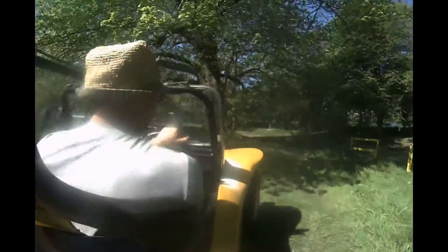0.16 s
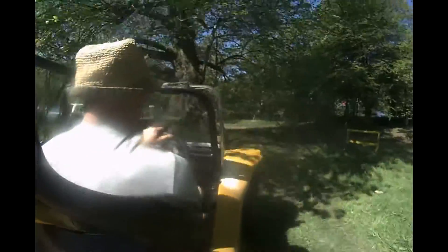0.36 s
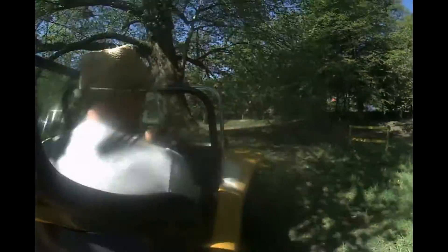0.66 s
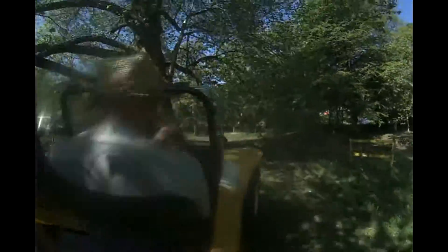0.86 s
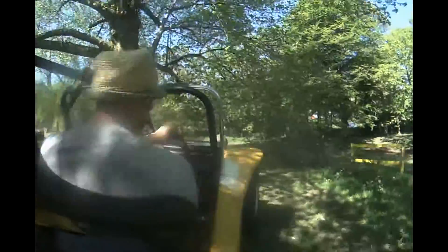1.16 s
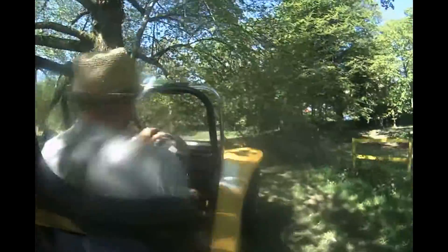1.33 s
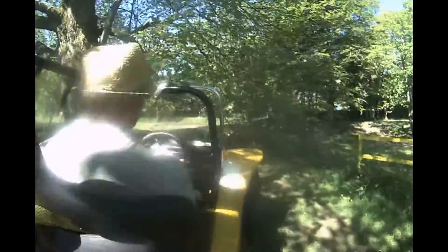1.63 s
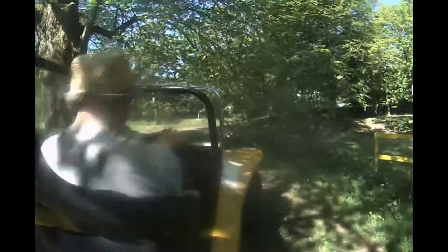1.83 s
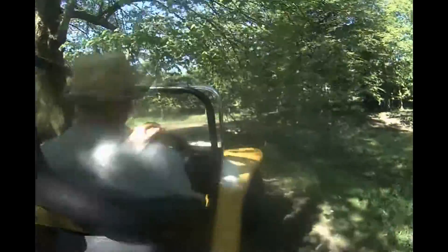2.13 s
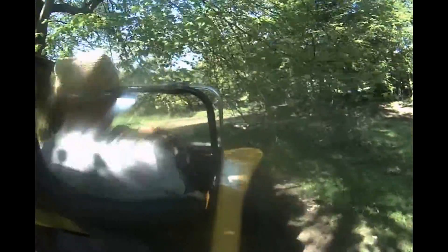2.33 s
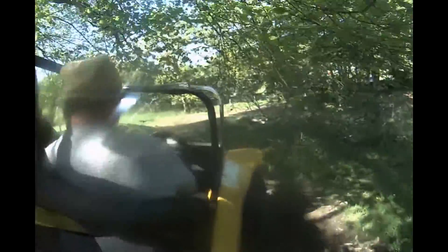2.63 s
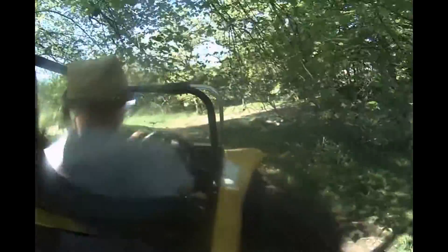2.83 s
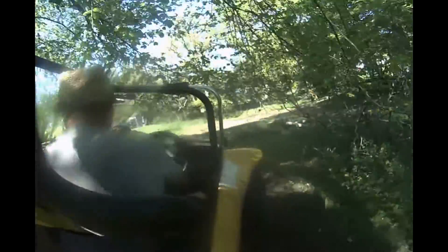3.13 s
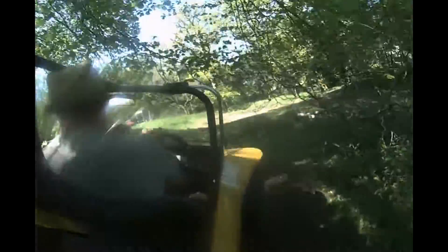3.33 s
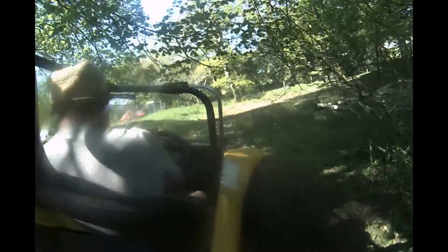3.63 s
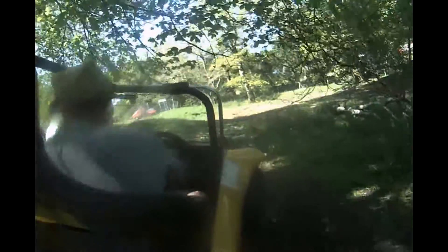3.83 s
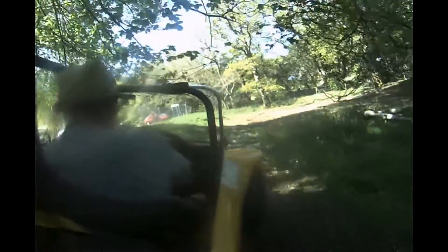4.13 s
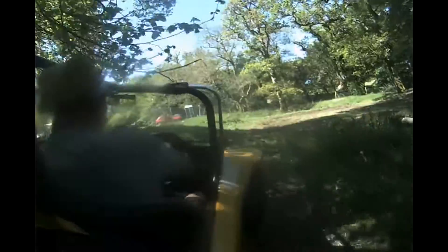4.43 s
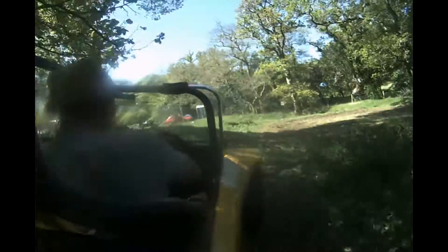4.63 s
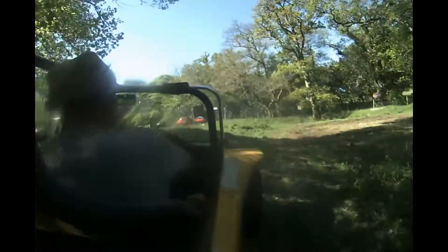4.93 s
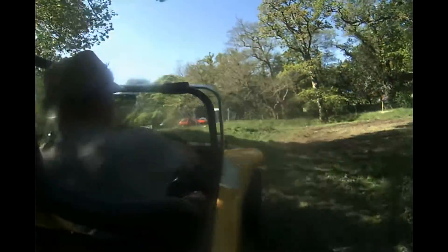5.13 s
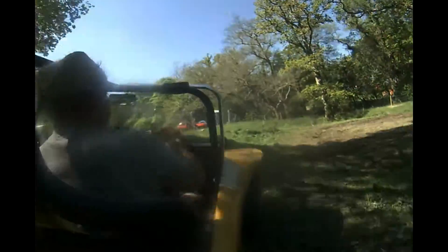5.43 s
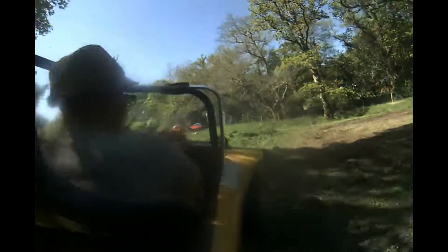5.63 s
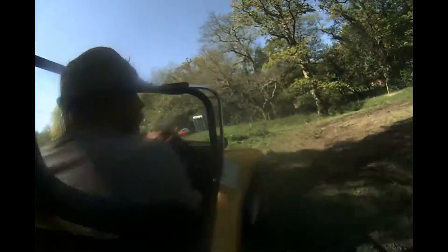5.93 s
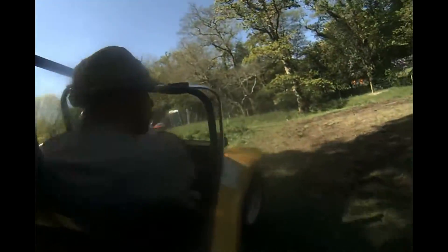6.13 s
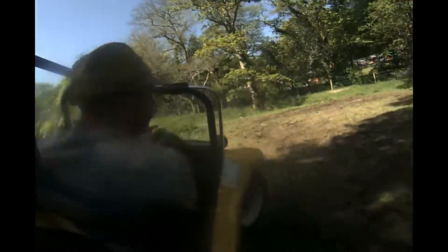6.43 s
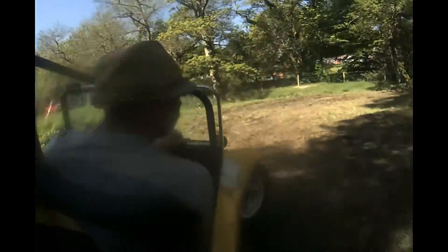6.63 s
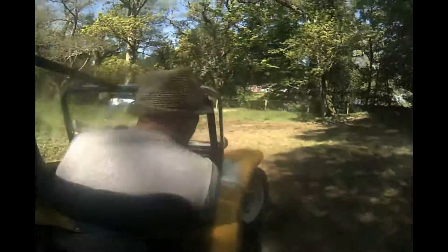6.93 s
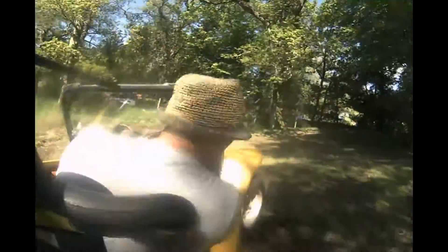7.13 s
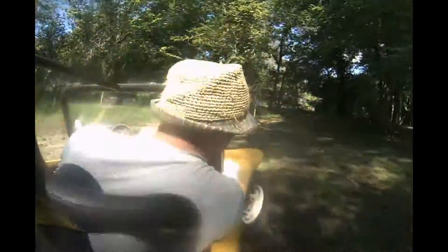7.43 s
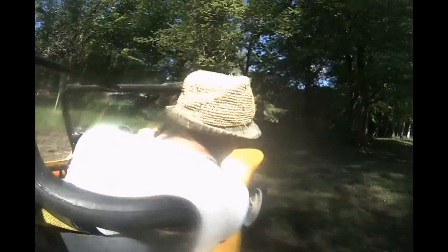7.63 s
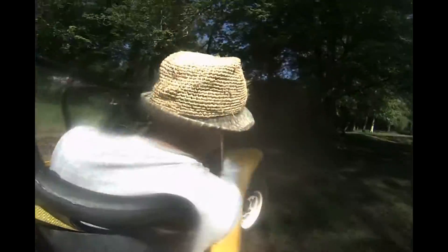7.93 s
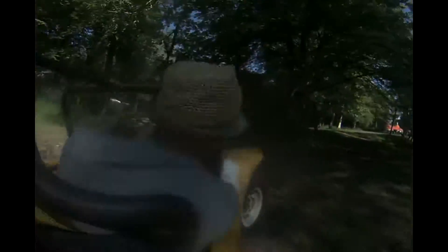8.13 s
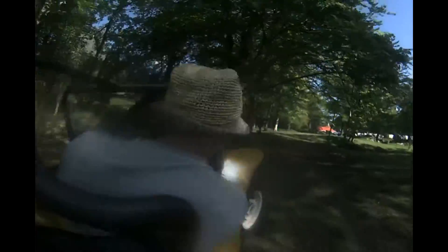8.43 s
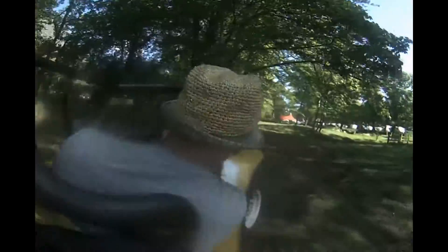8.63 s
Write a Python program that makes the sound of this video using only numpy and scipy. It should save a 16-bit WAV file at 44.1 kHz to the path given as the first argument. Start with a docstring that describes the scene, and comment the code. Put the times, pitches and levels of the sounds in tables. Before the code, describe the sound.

A continuous, close, dry engine ride: tinny valve chatter, uneven exhaust throb, pulsing air hiss and a faint fan whine. Revs sag for three seconds, surge around four to five, drop, then climb once more. Smooth grass gives way to rutted dirt with heavier rumble, jingling metal, dull thuds and sharp body knocks that briefly overload the single on-board microphone. Open air, no echo.

```python
"""Buggy ride over dirt and grass

An air-cooled flat-four is heard from the back seat: it eases off and pulls twice. Pulses and gas noise through
resonances make the exhaust throb and bark; valve taps clatter with a ringing mid tone. Bumps ring out in mid
tones, boom in the tub and jingle loose fittings, and the hardest ones overload the microphone. Filtered noise
gives rolling and hissing air; sines give the fan, squeaks and ticks."""
import sys
import numpy as np
from scipy.fft import rfft, irfft, next_fast_len
from scipy.io import wavfile
from scipy.ndimage import uniform_filter1d, map_coordinates

SR = 44100
rng = np.random.default_rng(int(sys.argv[2]) if len(sys.argv) > 2 else 0)


def persist_wave(psi):
    """Save psi, clipped to +-1, as 16-bit WAV."""
    counts = np.round(np.clip(psi, -1, 1) * 32767).astype(np.int16)
    wavfile.write(sys.argv[1], SR, np.atleast_2d(counts).T)


N = 387198

# engine speed: time_s, firing_hz
ENGINE_SPEED = [(0, 84), (.35, 78), (.7, 76.5), (1.1, 70), (1.6, 61), (2.05, 60), (2.8, 54), (3.1, 56.5),
                (3.65, 54.5), (4.05, 65), (4.4, 67), (4.9, 83.5), (5.3, 89.5), (5.5, 88), (5.8, 75),
                (6.6, 56), (6.95, 62.5), (7.6, 65), (8.4, 80), (8.78, 75)]
# track, smooth grass to rutted dirt: time_s, roughness (0-1)
ROUGHNESS = [(0, 0.22), (.2, 0.29), (.6, 0.06), (3.6, 0.15), (4.2, .12), (4.6, 0.28), (5.7, 0.35),
             (6.05, 0.12), (6.6, 0.48), (6.92, 0.92), (7.12, .9), (7.3, .3), (7.43, 0.85), (7.8, 0.57),
             (8.5, 0.73), (8.78, 0)]
# low resonances of exhaust and body tub: centre_hz, width_hz, gain_db
TUB_MODES = [(45.8, 7.9, -0.5), (75, 8.5, -0.5), (115.3, 13.2, -1.5), (195.1, 5.6, 0.5), (354.7, 17, -8)]
# mid-frequency ring heard in taps and knocks: centre_hz, width_hz, gain_db
RING_MODES = [(1137, 78, -7.5), (1228, 116, -7.5), (1408.4, 91, 4.5), (1560, 99.5, 2), (1903, 200, -14),
              (2163, 76, -12), (2323, 240, -16)]
# ring of loose fittings: centre_hz, width_hz, gain_db
FITTING_MODES = [(3455, 200, 5.5), (3980, 120, 5), (4927, 126, 5.5), (5320, 90, 5.5), (5960, 310, 3.5),
                 (7025, 61, 6), (7540, 500, -4)]
# silencer outline: frequency_hz, gain_db
SILENCER_OUTLINE = [(300, -37.5), (520, -28.5), (600, -13), (668, 2.5), (725, -5.5), (785, 0), (825, -9.5),
                    (870, -17), (1000, -21), (1400, -47.5)]


def amp(db):
    """Decibels to gain."""
    return 10 ** (np.asarray(db) / 20)


def unit(x):
    """Scale to rms 1."""
    return x / np.sqrt(np.mean(x ** 2) + 1e-20)


def curves(rows):
    """Interpolate each column after the time to one value per sample."""
    time_s, *columns = np.transpose(rows)
    return [np.interp(np.arange(N) / SR, time_s, column) for column in columns]


def wobble(rate_hz):
    """Smooth random curve, rate_hz knots a second."""
    knots = rng.standard_normal(int(N * rate_hz / SR) + 4)
    return map_coordinates(knots, [np.arange(N) * rate_hz / SR])


def noise():
    """White noise."""
    return rng.standard_normal(N)


def ring(x, modes):
    """Sum of band-pass resonances of alternating sign, driven by x."""
    size = next_fast_len(len(x) + SR // 4)
    f = np.fft.rfftfreq(size, 1 / SR)
    response = 0
    for k, (centre, width, db) in enumerate(modes):
        damping = 1j * f * width
        response = response + (-1) ** k * amp(db) * damping / (centre ** 2 - f ** 2 + damping)
    return irfft(rfft(x, size) * response, size)[:len(x)]


def colour(x, outline):
    """Causal minimum-phase filter following (Hz, dB) points."""
    size = 2 * next_fast_len(len(x) // 2 + SR // 8)
    hz, db = np.transpose(outline)
    log_f = np.log(np.fft.rfftfreq(size, 1 / SR) + 1)
    gain = amp(np.interp(log_f, np.log(hz), db))
    # fold the cepstrum forward in time
    cepstrum = irfft(np.log(gain))
    cepstrum[1:size // 2] *= 2
    cepstrum[size // 2 + 1:] = 0
    return irfft(rfft(x, size) * np.exp(rfft(cepstrum)), size)[:len(x)]


def pulses(phase, scatter_db):
    """One impulse of random size each time the phase passes a whole number."""
    at = np.flatnonzero(np.diff(np.floor(phase)) > 0)
    out = np.zeros(N)
    out[at] = amp(scatter_db * rng.standard_normal(len(at)))
    return out


def grains(rate_hz, scatter_db):
    """Impulses of random size at random moments, on average rate_hz a second."""
    return (rng.random(N) < rate_hz / SR) * amp(scatter_db * np.clip(noise(), -2, 2))


def gate(phase, depth_db):
    """Gain that jumps up once a cycle and sinks by depth_db until the next."""
    return amp(-depth_db * (phase % 1))


def add(track, time_s, sound, peak_db):
    """Mix in a sound from time_s at the given peak level."""
    part = track[max(round(time_s * SR), 0):][:len(sound)]
    part += (amp(peak_db) * sound / np.abs(sound).max())[:len(part)]


def level(db, octave_db=0, throttle_db=0, rough_db=0):
    """Layer gain: db at cruising revs, plus dB per octave of revs, per full throttle and roughness."""
    cruise_hz = 70
    # driver's foot: time_s, throttle (0-1)
    foot = [(0, 0.66), (.25, 0.62), (.5, 0.05), (1.3, 0.6), (1.85, 0.2), (3.95, 0), (4.1, 0.66),
            (4.7, 0.62), (5.65, 0.54), (6.0, 0.13), (6.75, 0.08), (7.05, .7), (7.3, 0), (8.1, 0.27),
            (8.78, 0)]
    (firing_hz,), (throttle,), (rough,) = curves(ENGINE_SPEED), curves(foot), curves(ROUGHNESS)
    revs_db = octave_db * np.log2(firing_hz / cruise_hz)
    return amp(db + revs_db + throttle_db * throttle + rough_db * rough)


def shaken(rate_hz):
    """Random moments (s), rate_hz on the roughest ground, falling as roughness squared."""
    rough, = curves(ROUGHNESS)
    return np.flatnonzero(rng.random(N) < rate_hz * rough ** 2 / SR) / SR


def engine():
    """Exhaust, valve gear, fan and hissing air all follow one crankshaft phase."""
    # strength of each cylinder in firing order: gain_db
    cylinder_db = [0.5, 0.5, 2.5, 0.61]
    firing_hz, = curves(ENGINE_SPEED)
    firing = np.cumsum(firing_hz * (1 + 0.004025 * wobble(16))) / SR  # phase in firings
    cylinder = amp(cylinder_db)[firing.astype(int) % len(cylinder_db)]
    return exhaust(firing, cylinder) + clatter(firing, cylinder) + fan(firing) + hiss(firing)


def exhaust(firing, cylinder, near_pipe_db=10):
    """Each firing is a pressure pulse, then a puff of turbulent gas; load makes pulses cleaner."""
    # firing note, swelling and fading in the tub: time_s, relative_db
    throb_level = [(0.0, -36), (0.44, -32), (0.73, -48), (0.8, -30), (1.93, -45), (2.57, -40), (3.45, -43),
                   (3.89, -26.5), (4.01, -40), (4.65, -29), (4.77, -37.5), (6.89, -28.5), (6.92, -42),
                   (7.95, -24), (8.41, -46), (8.78, -30)]
    throb_db, = curves(throb_level)
    pops = unit(pulses(firing + 0.005 * wobble(60), scatter_db=1.6) * cylinder)
    puffs = unit(noise() * gate(firing, depth_db=4) * cylinder)
    # every other firing leaves by the nearer tailpipe
    piped = unit(pops * amp(near_pipe_db * (firing.astype(int) % 2)))
    turbulence = level(5.5, throttle_db=-9)
    bark = unit(colour(piped + turbulence * puffs, SILENCER_OUTLINE)) * amp(0.88 * wobble(22))
    boom = unit(ring(pops + amp(2.5) * puffs, TUB_MODES))
    throb = unit(np.sin(2 * np.pi * firing) * amp(1.3 * wobble(5.4)))
    return (level(-29.5, octave_db=4.5, throttle_db=11) * bark
            + amp(throb_db - 0.5) * throb
            + level(-44.5, octave_db=8) * boom)


def clatter(firing, cylinder):
    """Valve taps twice a firing and looser chatter ring out in mid tones, harder with revs and jolting."""
    # clatter outline: frequency_hz, gain_db
    clatter_outline = [(400, -37), (950, -16.5), (1150, -2), (1620, -1.5), (1760, -3.5), (2400, -2.5),
                       (2700, -10.5), (3100, -13), (5000, -42), (12000, -63)]
    taps = unit(pulses(2 * firing + 0.058 * wobble(90), scatter_db=2) * cylinder)
    shake = gate(firing / 2, depth_db=3) * amp(1.6 * wobble(55))  # one jolt per crank turn
    chatter = unit(grains(rate_hz=2200, scatter_db=1.5) * shake)
    blows = taps + amp(8.0) * chatter
    # the drive of each ringing mode varies on its own
    metal = np.zeros(N)
    for k, mode in enumerate(RING_MODES):
        metal += (-1) ** k * ring(blows * amp(1.31 * wobble(24)), [mode])
    gain = level(-19.0, octave_db=4.5, throttle_db=2.5, rough_db=8.0) * amp(0.61 * wobble(23))
    return gain * unit(colour(metal, clatter_outline))


def fan(firing, blades_per_firing=15.3, rms_db=-49.0):
    """The belt-driven cooling fan whines faintly and unsteadily at its blade rate."""
    phase = blades_per_firing * firing + 0.15 * wobble(11)
    return amp(rms_db) * unit(np.sin(2 * np.pi * phase) * amp(3.1 * wobble(7.5)))


def hiss(firing):
    """Air noise jumps up at each firing and sinks until the next."""
    # air outline: frequency_hz, gain_db
    air_outline = [(1500, -14), (2600, 7.5), (3300, 10), (4500, 3.5), (7000, 3.5), (8600, 4), (10200, 9.5),
                   (11500, 5), (13000, 1), (15500, -19)]
    air = unit(colour(noise() * gate(firing, depth_db=6.5), air_outline))
    return level(-46.5, octave_db=1.0, throttle_db=5.5, rough_db=3.5) * air


def knocks(contact_0db_s=0.021, longer_per_db=0.59, scrape=0.11, thud_db=-31, pipe_db=-15):
    """A blow with a brief scrape rings out in mid tones, silencer and tub; rough ground adds lesser jolts."""
    # bumps that knock the body: time_s, relative_db
    bumps = [(0.349, -1.5), (.431, -6.5), (.69, -5), (1.181, -0.5), (1.844, -16), (2.617, 0), (3.51, -4.5),
             (3.813, 3), (3.818, 3), (3.827, 3), (3.848, 2.5), (3.936, -0.5), (3.978, -4.5), (3.995, -3.5),
             (4.557, -1.5), (4.702, -3), (5.557, -2), (5.881, -1.5), (6.736, 4), (6.744, -1), (6.84, -2.5),
             (6.901, -2), (6.998, -17), (7.008, -2), (7.12, -5), (7.436, -1.5), (7.664, 1.5), (7.693, -0.5),
             (8.128, 0), (8.212, -0.5), (8.398, 3.5), (8.429, 2.5)]
    # what a cushioned blow passes to the mid-frequency ring: frequency_hz, gain_db
    cushion = [(400, -8.5), (1000, -3.5), (1600, -1.5), (1900, -2.5), (2600, -6), (5000, -30), (12000, -44)]
    jolts = [(s, -8) for s in shaken(rate_hz=7)]
    out, t = np.zeros(N), np.arange(SR // 6) / SR
    for s, db in bumps + jolts:
        grind_s = contact_0db_s * np.exp(longer_per_db * db)  # 60 dB decay, longer for harder bumps
        blow = (t == 0) + scrape * rng.standard_normal(len(t)) * amp(-60 * t / grind_s)
        add(out, s, colour(ring(blow, RING_MODES), cushion), db + 0.5)
        add(out, s, colour(blow, SILENCER_OUTLINE), db + pipe_db)
        add(out, s, ring(blow, TUB_MODES), db + thud_db)
    return out


def thuds():
    """A wheel dropping into a rut drums the tub without any metallic ring."""
    # soft thuds of wheels in ruts: time_s, peak_db, length_s
    ruts = [(1.85, -30, 0.072), (2.23, -27, .09), (2.6, -24, 0.085), (2.89, -24, 0.1), (3.13, -29, 0.082),
            (3.84, -19, .12), (4.572, -27, 0.028), (4.84, -23, 0.034), (7.08, -23, 0.19), (8.2, -27, 0.29),
            (8.6, -20.5, .2)]
    out = np.zeros(N)
    for s, db, length_s in ruts:
        window = np.hanning(round(length_s * SR))
        push = np.pad(window * rng.standard_normal(len(window)), (0, SR // 5))
        add(out, s - length_s / 3, ring(push, TUB_MODES[1:4]), db)
    return out


def chinks(t60_s=0.057):
    """Loose metal fittings buzz briefly against the frame; rough ground adds fainter chinks."""
    # chinks of loose fittings: start_s, relative_db
    hits = [(1.181, -31), (2.618, -28), (3.821, -13.5), (3.935, -16.5), (3.991, -24), (5.862, -26.5),
            (6.132, -25.5), (6.66, -26.5), (7.075, -25), (7.152, -28), (7.231, -20.5), (7.433, -18.5),
            (7.459, -19.5), (7.487, -18.5), (7.637, -26), (7.77, -22), (7.993, -20.5)]
    faint = [(s, -27) for s in shaken(rate_hz=10)]
    out, t = np.zeros(N), np.arange(SR // 10) / SR
    for s, db in hits + faint:
        buzz = rng.standard_normal(len(t)) * amp(-60 * t / t60_s)
        add(out, s, ring(buzz, FITTING_MODES), db + 4.5)
    return out


def squeaks(length_s=0.013, waver=0.018):
    """Rubbing metal of springs and seat frame sings for an instant on one wavering pitch."""
    # short squeaks: time_s, peak_db, pitch_hz
    rubs = [(4.637, -33, 5140), (4.819, -33, 7550), (4.875, -27, 5200), (6.368, -34, 7600),
            (7.139, -34, 5300), (8.042, -33, 7650)]
    out, window = np.zeros(N), np.hanning(round(length_s * SR))
    for s, db, hz in rubs:
        drift = unit(uniform_filter1d(rng.standard_normal(len(window)), size=60))
        pitch_hz = hz * (1 + waver * drift)
        add(out, s - length_s / 4, window * np.sin(2 * np.pi * np.cumsum(pitch_hz) / SR), db)
    return out


def ticks(t60_s=0.0012):
    """Tiny dry ticks: cosines that die in about a millisecond."""
    # dry ticks: start_s, peak_db, pitch_hz
    clicks = [(1.476, -17, 3740), (2.776, -11.5, 3450), (4.577, -1.5, 2492), (4.843, -4.5, 2500),
              (5.61, -10, 2507), (7.677, -6, 3920), (8.576, -6.5, 10200), (8.702, -4.5, 12600)]
    out, t = np.zeros(N), np.arange(SR // 100) / SR
    for s, db, hz in clicks:
        add(out, s, np.cos(2 * np.pi * hz * t) * amp(-60 * t / t60_s), db)
    return out


def rolling(dip_s=0.09):
    """Rough ground rumbles through tyres and tub and keeps the fittings jingling."""
    # dips that set the tub booming on its springs: centre_s, swell_db
    dips = [(.55, 8), (2.569, 11), (3.5, 5), (5.7, 8), (6.3, 8), (7.359, 11), (8.66, 12)]
    # tyre outline: frequency_hz, gain_db
    tyre_outline = [(20, -20), (33, -12), (45, -9), (60, 9), (90, 6), (160, 4.5), (260, -10.5), (500, 1.5),
                    (1000, -6), (3000, -28)]
    t = np.arange(N) / SR
    swell_db = sum(db * np.exp(-((t - s) / dip_s) ** 2) for s, db in dips)
    tyres = unit(colour(noise(), tyre_outline))
    sway = unit(ring(noise(), TUB_MODES[:2]))
    drum = unit(ring(noise(), TUB_MODES[2::2]))
    pan = unit(ring(noise(), [TUB_MODES[3]]))
    rumble_gain = level(-43.0, octave_db=3.0, rough_db=15.5) * amp(2.4 * wobble(15))
    rumble = rumble_gain * (amp(-2.5) * tyres + amp(-4.5) * drum)
    boom = level(-45.5, rough_db=13) * amp(swell_db) * sway
    hum = level(-52.5, octave_db=7, rough_db=20.5) * pan
    # each fitting rattles in fits of its own
    rattles = unit(sum(ring(noise() * amp(2.5 * wobble(40)), [mode]) for mode in FITTING_MODES))
    jingle = level(-44.0, octave_db=7, rough_db=6.0) * amp(wobble(40)) * rattles
    return rumble + boom + hum + jingle


def scene():
    """Sum of everything on board, in open air: one channel."""
    mix = engine() + knocks() + thuds() + chinks() + squeaks() + ticks() + rolling()
    return mix[None]


def record(dry):
    """The microphone clips at full scale and keeps nothing above its band limit."""
    top_hz = 15900
    clipped = np.clip(dry, -1, 1)
    passed = np.fft.rfftfreq(N, 1 / SR) < top_hz
    return irfft(rfft(clipped) * passed, N)


dry = scene()
out = record(dry)
persist_wave(out)
```